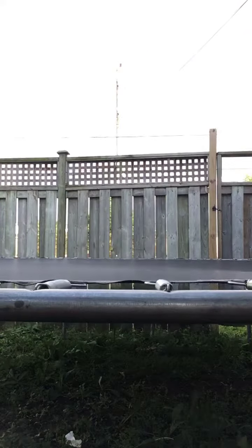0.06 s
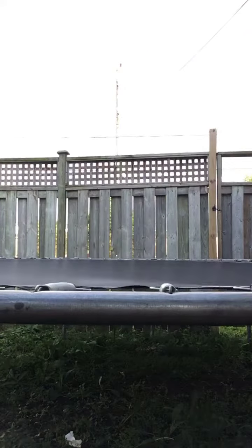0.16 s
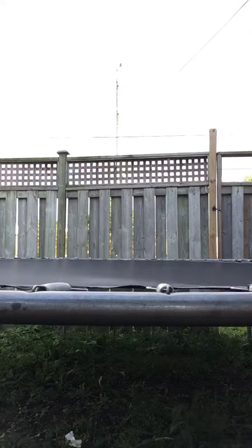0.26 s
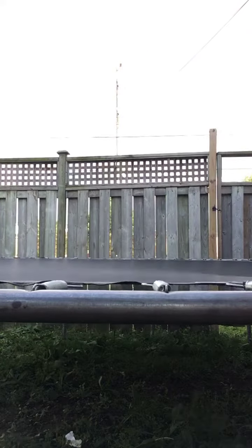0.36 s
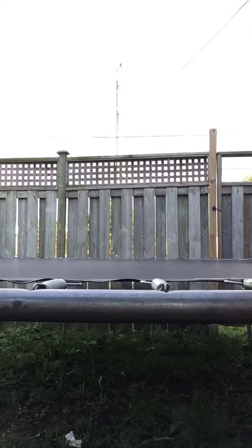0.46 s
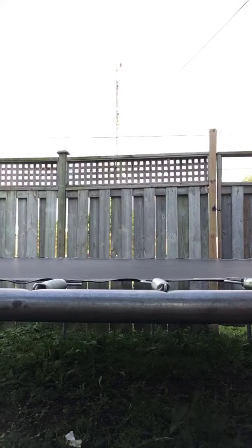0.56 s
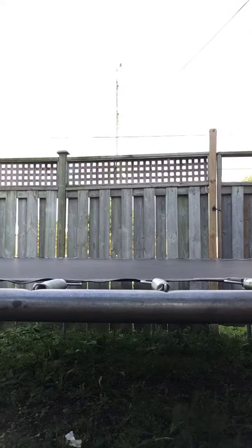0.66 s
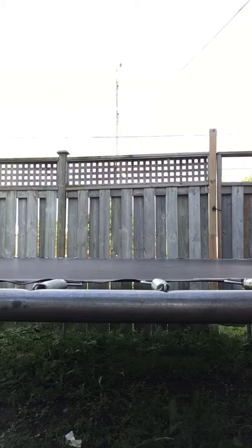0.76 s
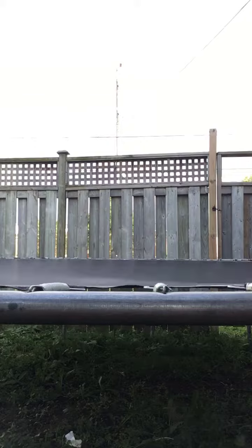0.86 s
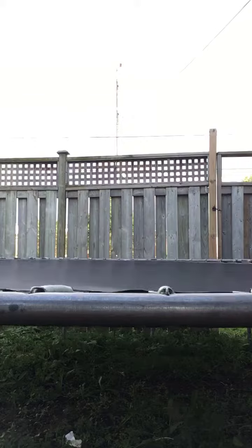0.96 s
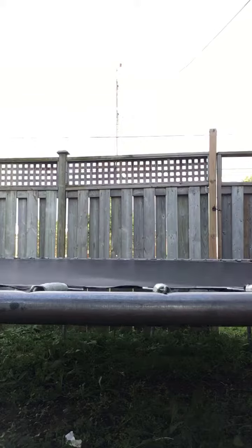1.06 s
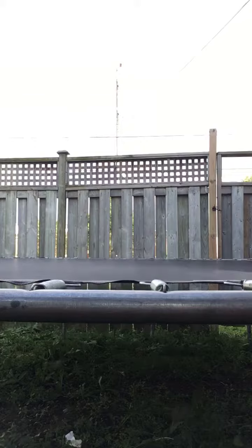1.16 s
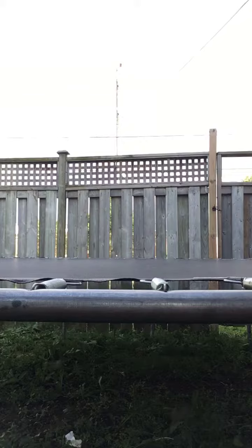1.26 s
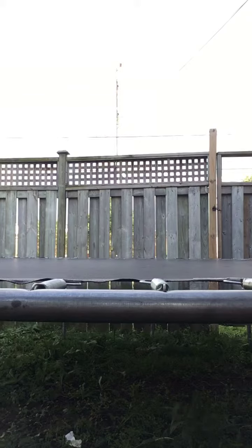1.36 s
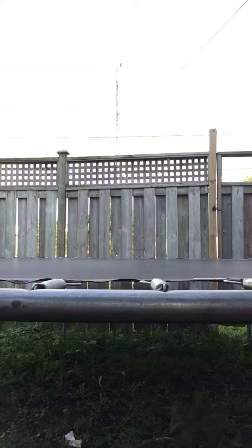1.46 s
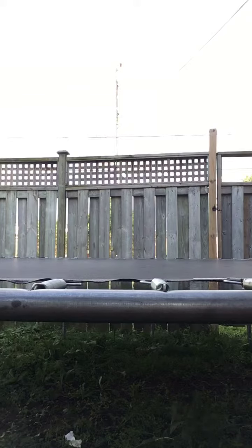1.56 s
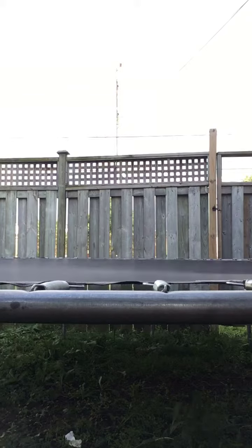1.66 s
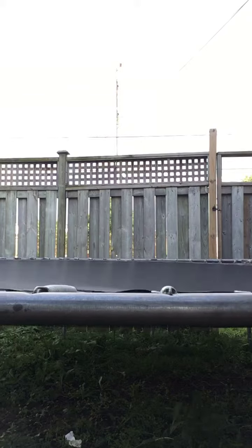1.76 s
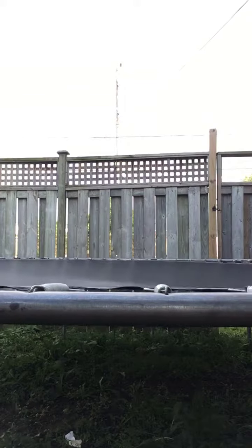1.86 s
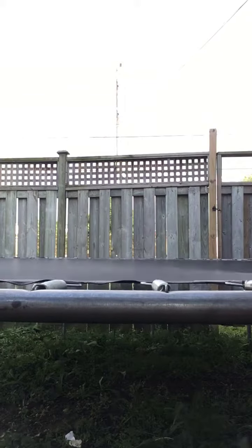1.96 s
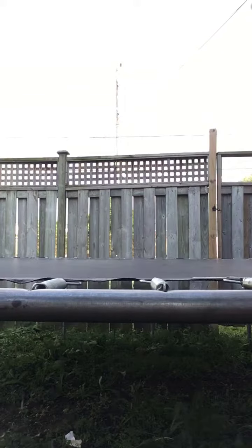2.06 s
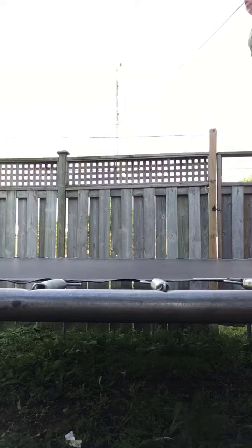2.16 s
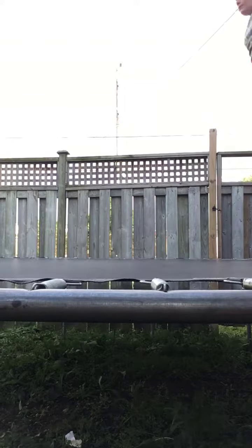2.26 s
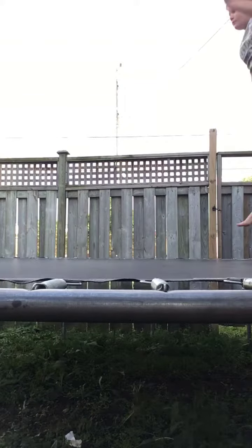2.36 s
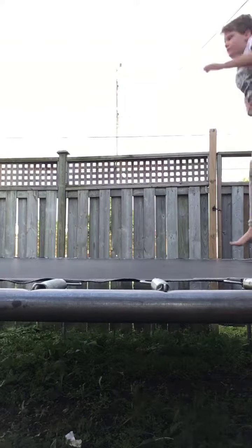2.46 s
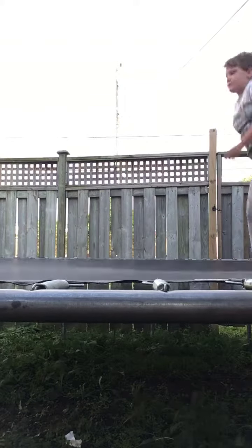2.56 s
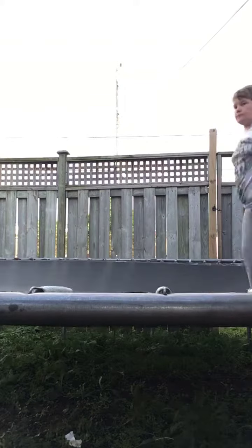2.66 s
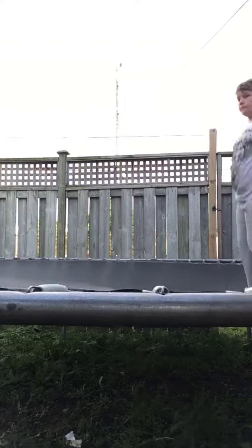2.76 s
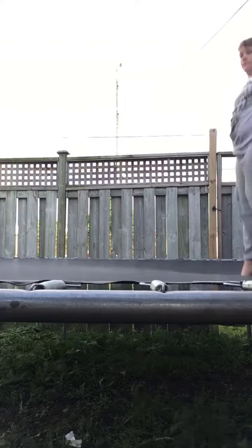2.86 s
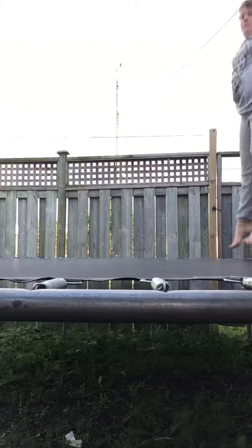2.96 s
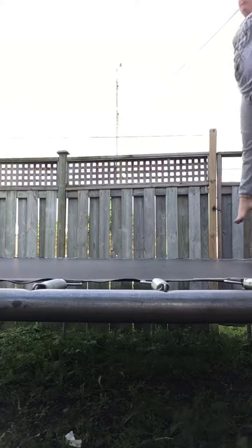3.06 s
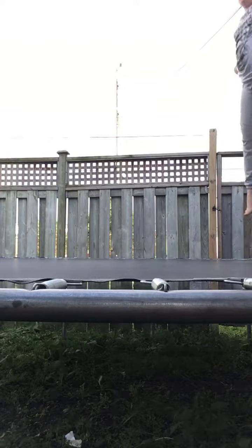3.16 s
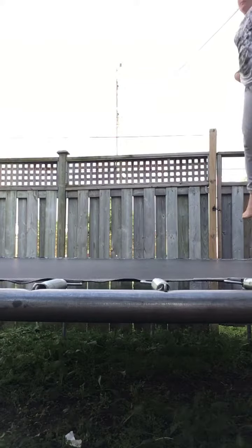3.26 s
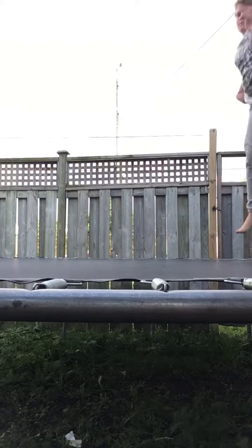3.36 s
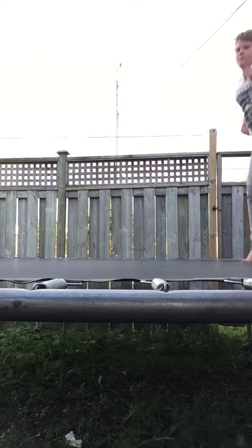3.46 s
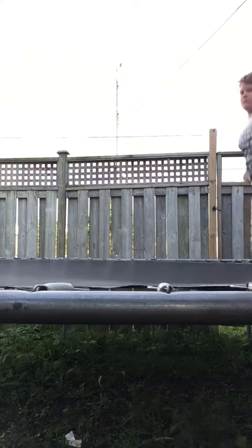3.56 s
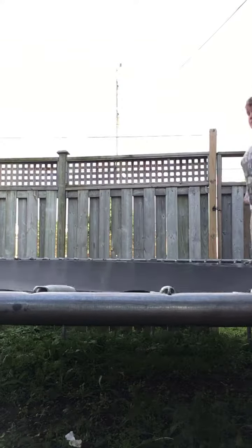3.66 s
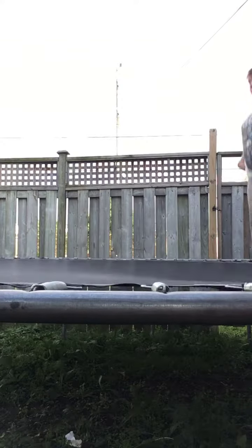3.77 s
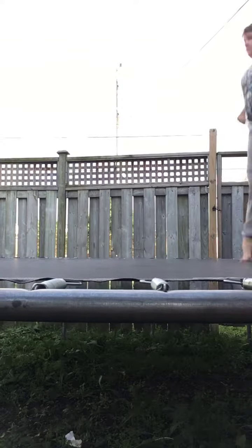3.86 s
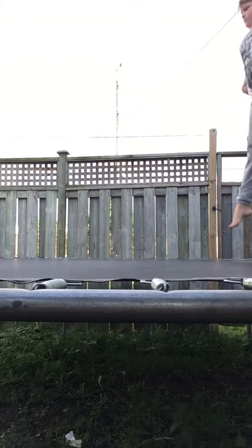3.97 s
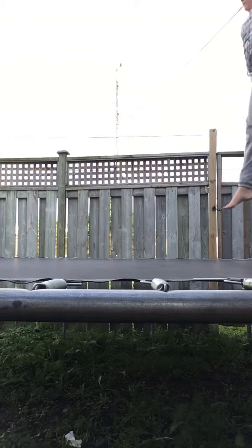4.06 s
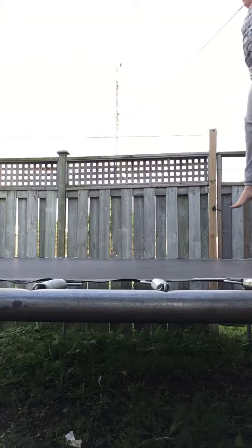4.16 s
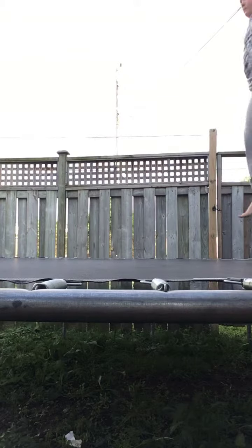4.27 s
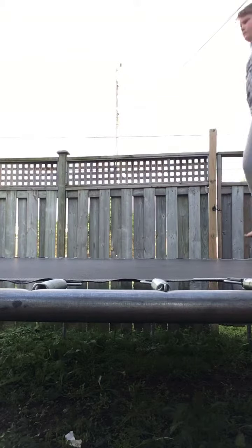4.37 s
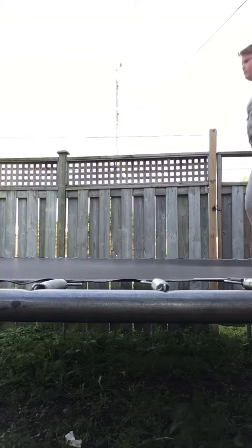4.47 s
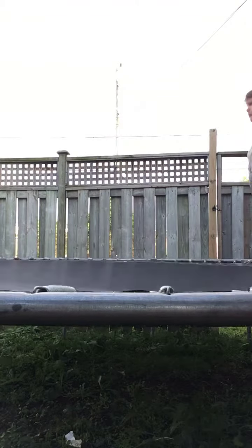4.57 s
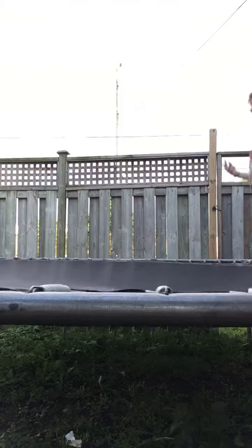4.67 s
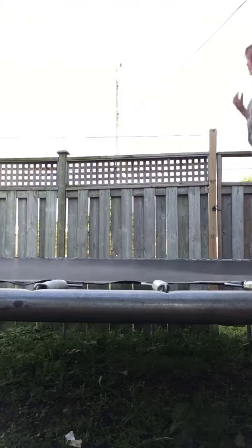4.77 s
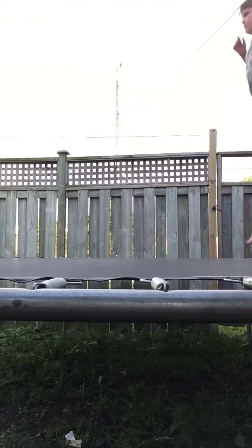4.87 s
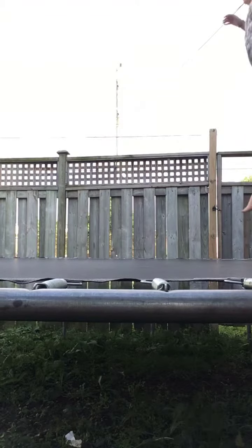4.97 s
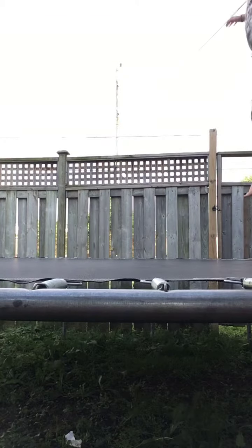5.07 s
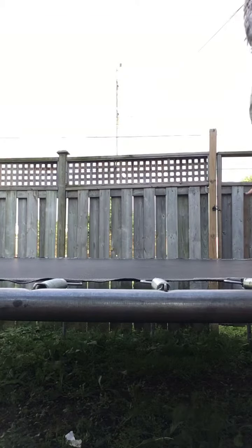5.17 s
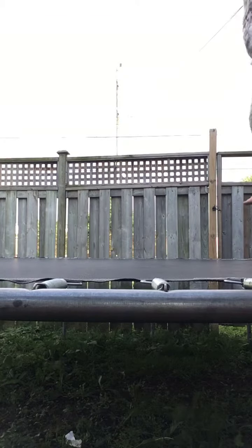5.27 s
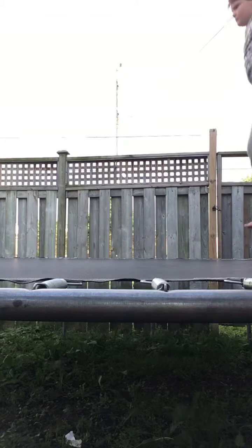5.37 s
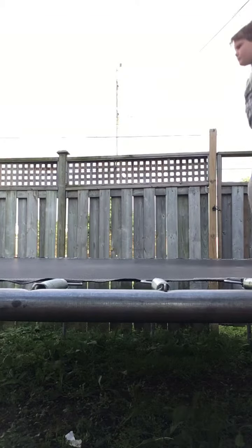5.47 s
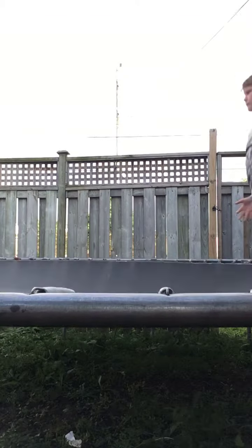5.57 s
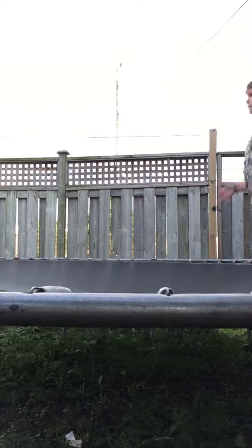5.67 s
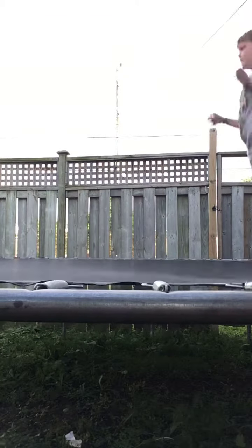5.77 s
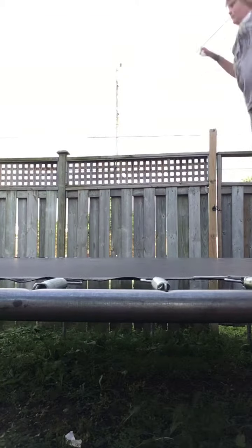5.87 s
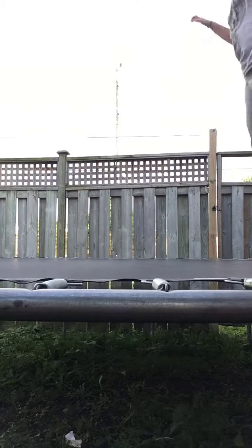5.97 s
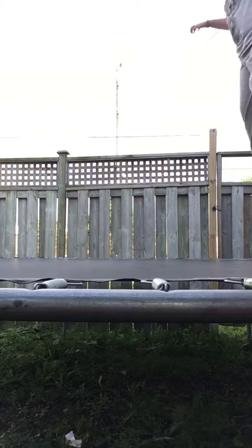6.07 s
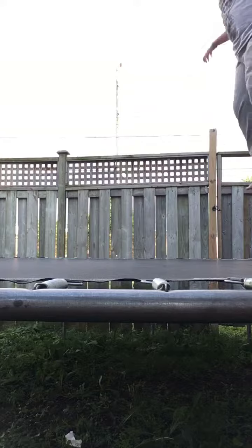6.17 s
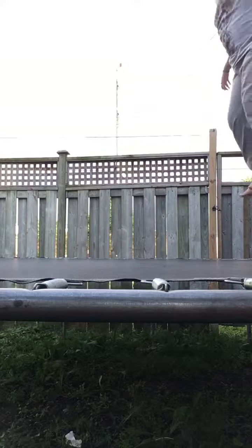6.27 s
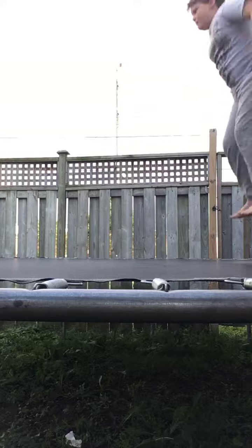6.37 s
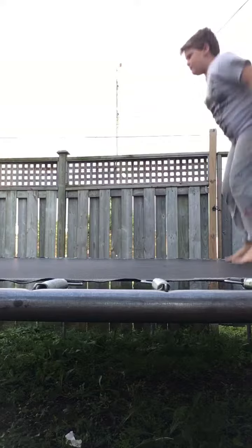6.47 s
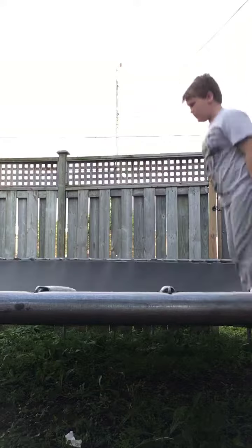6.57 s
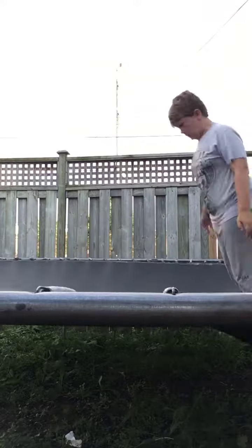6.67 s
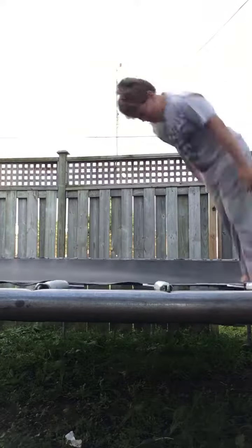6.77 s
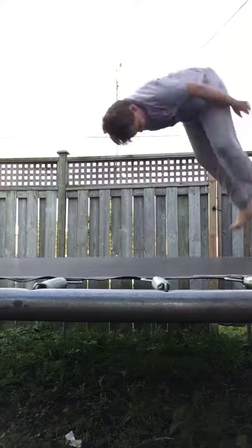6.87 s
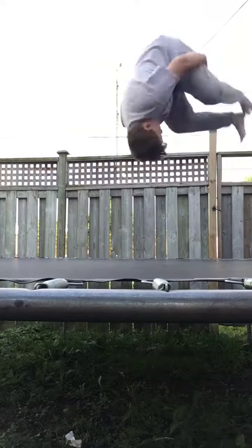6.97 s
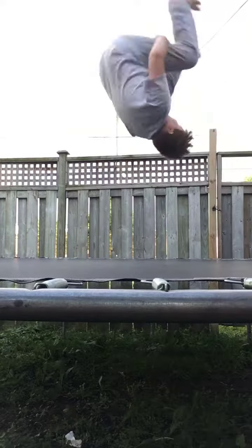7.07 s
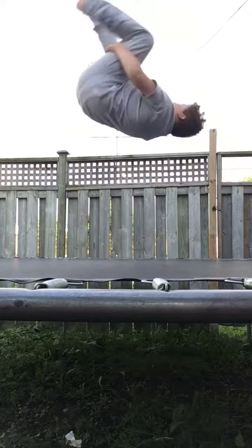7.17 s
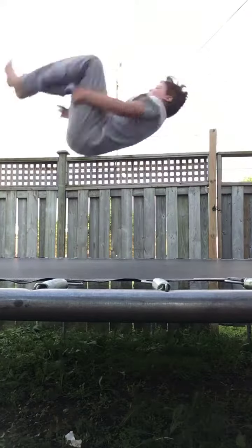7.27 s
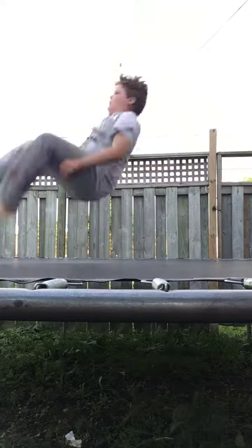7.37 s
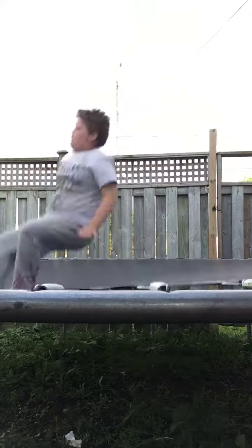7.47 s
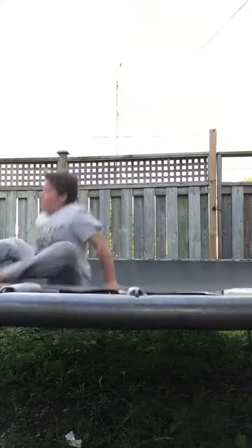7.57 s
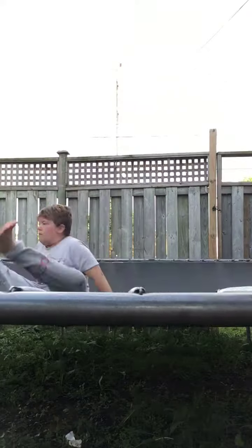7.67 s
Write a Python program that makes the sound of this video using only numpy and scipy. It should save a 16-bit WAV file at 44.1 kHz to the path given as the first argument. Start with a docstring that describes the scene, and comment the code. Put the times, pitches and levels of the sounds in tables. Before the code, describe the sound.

Trampoline springs rasp, clack and squeak with each of nine steady bounces outdoors, ending in a heavier thudding landing.

```python
"""Rasping springs and clacking hooks: someone bounces on a backyard trampoline, heard from beside its
steel frame, and lands heavily at the end. Each landing stretches the mat and springs, which rasp as they
load and again as they let go. Hooks clack and squeak; a spring rings on between bounces. Feet and body
slap the mat in the final landing. The higher jumps thud and fan puffs of air at the microphone, over a
low outdoor rumble."""
import sys
import numpy as np
from scipy import signal
from scipy.fft import rfft, irfft, next_fast_len
from scipy.io import wavfile
from scipy.ndimage import uniform_filter1d, map_coordinates

SR = 44100
rng = np.random.default_rng(int(sys.argv[2]) if len(sys.argv) > 2 else 0)


def generate_wav(sig):
    """Save sig (samples, or channels by samples) to the path in sys.argv[1] as 16-bit PCM at SR."""
    pcm = np.round(np.clip(np.atleast_2d(sig).T, -1, 1) * 32767).astype(np.int16)
    wavfile.write(sys.argv[1], SR, pcm)


N = 340893
T = np.arange(N) / SR
EDGE_HZ = 15850

# landings: (touchdown [s], slap [dB], time to full stretch [s], swell [s per 20 dB], hold [s],
# stretch [dB], time on mat [s], ring [dB], spring left ringing [name])
BOUNCES = [(.2, -42, .06, .075, .056, -34.5, .36, -61, "low"),
           (.943, -43, .075, .125, .01, -35, .39, -70, "low"),
           (1.793, -54, .055, .06, .02, -31, .35, -66, "low"),
           (2.692, -31.5, .065, .13, .06, -35.5, .39, -57, "low"),
           (3.617, -33, .103, .065, .036, -33.5, .38, -59, "low"),
           (4.586, -37, .098, .085, .04, -32.5, .42, -51.5, "high"),
           (5.594, -27.5, .11, .24, .016, -31.5, .43, -51, "high"),
           (6.616, -27, .085, .055, .042, -32, .375, -50, "high"),
           (7.541, -44, .058, .035, .036, -33, .4, -50, "high")]
# spring rasp spectrum: (frequency [Hz], level [dB])
RASP = [(300, -42), (900, -7), (2500, -4), (3800, -4), (4900, -4.5), (6000, -2), (7600, -1), (8800, 2.5),
        (10300, -4), (11200, -4), (13000, -8), (15800, -11.5)]


def amp(db):
    """Decibels to gain."""
    return 10 ** (np.asarray(db) / 20)


def unit(x):
    """Scales to rms 1."""
    return x / np.sqrt(np.mean(x ** 2) + 1e-20)


def add(mix, start_s, sound):
    """Mixes a sound in at start_s."""
    part = mix[max(round(start_s * SR), 0):][:len(sound)]
    part += sound[:len(part)]


def colour(x, points):
    """Filters x by (frequency [Hz], level [dB]) points on a log-frequency axis; rms 1."""
    hz, db = np.transpose(points)
    size = next_fast_len(len(x))
    bins_hz = np.fft.rfftfreq(size, 1 / SR)
    gain = amp(np.interp(np.log(bins_hz + 1), np.log(hz), db))
    return unit(irfft(rfft(x, size) * gain, size)[:len(x)])


def drift(rate_hz):
    """Smooth random wander; rms 1."""
    knots, t = rng.standard_normal(N // 50), T[::20]
    return unit(np.interp(T, t, map_coordinates(knots, [t * rate_hz], order=2, mode="wrap")))


def strike(t, rise_s, t60_s):
    """Impact envelope: quick rise, exponential decay."""
    return (1 - np.exp(-t / rise_s)) * amp(-60 * t / t60_s)


def swell(peak_s, hold_s, db, rise_db_per_s, fall_db_per_s):
    """Gain that climbs to db at peak_s, holds, and falls away."""
    before_db = rise_db_per_s * np.maximum(peak_s - T, 0)
    after_db = fall_db_per_s * np.maximum(T - peak_s - hold_s, 0)
    return amp(np.maximum(db - before_db - after_db, -150))


def slips(per_s, spread_db):
    """Tiny friction slips: random clicks, a few of them large; rms 1."""
    size = amp(spread_db * np.minimum(rng.exponential(1, N), 3))
    return unit(rng.choice([-1., 1.], N) * size * (rng.random(N) < per_s / SR))


def yard():
    """Distant outdoor rumble and a faint wavering hum."""
    # outdoor air: (frequency [Hz], level [dB])
    spectrum = [(25, -32), (40, -17), (62, -2.5), (90, -7.5), (125, -24), (150, -18), (210, -16.5),
                (320, -23), (470, -25.5), (620, -25), (1340, -27), (2000, -37.5), (2450, -35), (3300, -44),
                (5000, -49.5), (15500, -54.5)]
    air = amp(-51) * colour(rng.standard_normal(N), spectrum) * amp(.5 * drift(7.5))
    air = signal.sosfilt(signal.butter(4, 34, "high", fs=SR, output="sos"), air)
    hum = amp(-57.5) * np.sin(2 * np.pi * 120 * T + 0.85 * drift(5.8))
    return air + hum * (1 + .5 * np.tanh(drift(5)))


def sliding():
    """How hard the springs slide: a surge as the mat sinks, light slipping under load, fits as it rises."""
    # springs sliding back: (time [s], hold [s], level [dB])
    recoils = [(.01, 0.0091, -42.5), (0.46, .035, -52.5), (0.522, 0.027, -44.5), (1.19, 0.036, -48.5),
               (1.262, .05, -42), (2.063, 0.05, -42.5), (2.903, 0.094, -41.5), (3.046, 0.061, -49),
               (3.175, 0.0066, -58), (3.866, 0.016, -38.5), (3.93, 0.013, -41), (4.057, 0.012, -54),
               (4.801, .02, -37), (4.993, 0.011, -42.5), (5.09, 0.0088, -55), (5.83, .01, -43.5),
               (5.887, 0.026, -40), (5.991, 0.02, -43), (6.83, 0.014, -40), (6.903, .025, -40),
               (6.96, 0.027, -42.5), (7.08, 0.015, -53.5)]
    grip_s, take_up_s, settle_s = 0.026, 0.049, 0.015  # settle: the mat quivers after the feet leave
    power = np.zeros(N)
    for s, _, delay_s, swell_s, hold_s, db, stay_s, _, _ in BOUNCES:
        grip = np.clip((T - s) / grip_s, 0, 1)
        surge = grip * swell(s + delay_s, hold_s, db, rise_db_per_s=20 / swell_s, fall_db_per_s=297)
        loaded_s = stay_s + settle_s - take_up_s
        contact = swell(s + take_up_s, loaded_s, db=-51.5, rise_db_per_s=317, fall_db_per_s=206)
        power += surge ** 2 + contact ** 2
    for s, hold_s, db in recoils:
        power += swell(s, hold_s, db, rise_db_per_s=560, fall_db_per_s=272) ** 2
    return np.sqrt(power)


def jangle(x, t60_s, ring_db, count=4):
    """Adds dense ringing to x: decaying noise tails, with the drive wandering among them."""
    t = T[:SR // 3]
    shares = np.array([drift(22) for _ in range(count)])
    shares /= np.linalg.norm(shares, axis=0)
    tails = rng.standard_normal((count, len(t))) * amp(-60 * t / t60_s)
    tails /= np.linalg.norm(tails, axis=1, keepdims=True)
    return x + amp(ring_db) * signal.oaconvolve(x * shares, tails, axes=1).sum(0)[:N]


def clinks(per_s, t60_s, count=28):
    """Coils touch one another: brief pings, each spring at its own pitch."""
    out, t = np.zeros(N), T[:SR // 12]
    pitches_hz = rng.uniform(3000, 12500, count)
    for when, which, size, life in rng.random((int(per_s * N / SR), 4)):
        shape = strike(t, rise_s=0.0028, t60_s=t60_s * (.5 + life))
        tone = np.sin(2 * np.pi * pitches_hz[int(which * count)] * t)
        add(out, when * N / SR, amp(28 * size ** 2) * shape * tone)
    return colour(out, RASP)


def groan():
    """The frame tubes creak with a low, hollow voice."""
    # tube resonances: (frequency [Hz], level [dB])
    spectrum = [(440, -50), (540, -11.5), (605, 6), (680, -21.5), (790, -2.5), (900, -12), (1300, -43)]
    return colour(slips(per_s=900, spread_db=0.87), spectrum)


def stretching():
    """Slips in the hooks and mat edge follow the load of each bounce; returns (springs, frame)."""
    # frame scrape: (frequency [Hz], level [dB])
    spectrum = [(100, -18), (300, -15.5), (480, -9.5), (600, -4), (850, -3.5), (1100, 1.5), (1500, -2),
                (1900, 0.5), (2300, -2.5), (2800, 1.5), (3400, -5), (5000, -13), (9000, -24)]
    load = sliding()
    judder_db = drift(130)  # hooks move in fits
    rasp = colour(jangle(slips(per_s=5000, spread_db=2.6), t60_s=0.11, ring_db=-1), RASP)
    rasp += amp(-14) * clinks(per_s=380, t60_s=0.05)
    scrape = colour(jangle(slips(per_s=1500, spread_db=3.6), t60_s=0.089, ring_db=3), spectrum)
    scrape_db = -22.96 + 0.5745 * T + 0.16 * judder_db  # hardens as the jumps get higher
    springs = rasp * load * amp(judder_db)
    frame = scrape * load ** 0.56 * amp(scrape_db) + amp(-20) * load * groan()
    return springs, frame


def coils(x, t60_s):
    """The strongest resonances of the coil springs, struck by x."""
    # coil modes: (frequency [Hz], level [dB])
    modes = [(610, -2), (790, -20), (1080, -12), (1230, 3), (1392, 14), (1680, 14), (2606, 12), (2828, 13),
             (3047, 7), (5830, -30), (7005, 16.5), (8010, 9), (8149, 11), (8393, -25), (8824, -19),
             (9170, -10)]
    t = T[:SR // 2]
    ring = sum(amp(db) * np.sin(2 * np.pi * (hz * t + rng.random())) for hz, db in modes)
    ring *= amp(-60 * t / t60_s)
    return signal.oaconvolve(x, ring / np.linalg.norm(ring))[:N]


def clacks():
    """Slaps on the mat and snapping hooks set the steel chattering; returns (springs, frame)."""
    # hooks snapping, and feet and body slapping the mat in the final landing:
    # (time [s], frame knock [dB], spring chink [dB])
    jolts = [(0.166, -53, -53), (0.199, -49, -46), (.229, -39, -51), (.252, -40, -34), (.312, -40, -48),
             (.624, -53, -49.5), (.857, -63, -58), (.923, -51, -74), (1.116, -40.5, -59),
             (1.733, -59, -55.5), (1.768, -48, -77), (1.794, -64, -44), (1.83, -42, -39), (2.282, -68, -60),
             (2.457, -54.5, -60.5), (2.67, -44, -41.5), (2.733, -35, -44), (2.868, -39.5, -32.5),
             (2.908, -43, -33.5), (3.382, -68, -60), (3.605, -37, -38), (4.558, -49, -55),
             (4.586, -46, -36.5), (4.789, -34.5, -34), (4.982, -34.5, -34), (5.217, -49.5, -66),
             (5.605, -22.5, -26), (5.823, -46, -33), (6.069, -45, -45), (6.207, -52, -59.5),
             (6.819, -39.5, -34.5), (6.987, -32, -36.5), (7.519, -58, -66), (7.539, -46.5, -42.5),
             (7.618, -24.5, -45), (7.719, -27, -30.5)]
    # frame knock: (frequency [Hz], level [dB])
    spectrum = [(100, -12), (450, -8.5), (640, -4.5), (1150, 6), (1500, 1), (1900, 2.5), (2500, -2.5),
                (3400, -11.5), (5000, -12), (9000, -21)]
    chink, knock, t = np.zeros(N), np.zeros(N), T[:SR // 2]
    slap = strike(t, rise_s=0.002, t60_s=0.14)
    for s, slap_db, *_ in BOUNCES:
        add(chink, s, amp(slap_db - 13) * slap)
        add(knock, s, amp(slap_db) * slap)
    for s, knock_db, chink_db in jolts:
        halvings = (max(knock_db, chink_db) + 38.5) / 19.5  # a harder jolt settles sooner
        jolt = strike(t, rise_s=0.0016, t60_s=.11 * .5 ** halvings)
        add(chink, s, amp(chink_db) * jolt)
        add(knock, s, amp(knock_db) * jolt)
    chink *= colour(slips(per_s=9000, spread_db=1.1), RASP)
    chink += amp(-11) * np.diff(chink, prepend=0)  # jolts are brighter than the steady rasp
    knock *= colour(slips(per_s=4000, spread_db=3.6), spectrum)
    return chink, knock


def rings(rise_s, t60_s):
    """A slack spring sings on as the feet leave; near pitches beat against each other."""
    # modes of two springs, by name: (frequency [Hz], level [dB])
    modes = {"low": [(2386, 0), (2396, -6), (2417, -9), (2251, -12)], "high": [(2454, 0), (2482, -1.5),
             (2523, -6.5)]}
    out, t = np.zeros(N), T[:2 * SR]
    shape = strike(t, rise_s, t60_s)
    for s, *_, stay_s, ring_db, spring in BOUNCES:
        for hz, db in modes[spring]:
            tone = np.sin(2 * np.pi * (hz * t + rng.random()))
            add(out, s + stay_s, amp(ring_db + db) * shape * tone)
    return out


def squeaks(waver, overtone_db, fall_db_per_s):
    """Hooks stick and slip: brief tones of unsteady pitch, dying away in the spring."""
    # hook squeaks: (time [s], length [s], pitch [Hz], level [dB])
    events = [(.944, 0.033, 1271, -45), (1.726, 0.054, 7100, -64), (2.168, .08, 2520, -54),
              (2.9, .03, 5870, -48), (3.62, 0.028, 2510, -42), (4.579, 0.04, 6920, -49),
              (4.786, 0.025, 5810, -40), (4.803, .03, 1890, -46.5), (4.977, .03, 6450, -43),
              (4.999, 0.044, 2604, -44), (5.0, 0.051, 4060, -53), (5.808, .025, 3510, -47),
              (6.003, 0.032, 1433, -38), (6.012, .043, 4080, -45.5), (6.014, .044, 5375, -51),
              (6.99, .12, 2500, -47), (7.587, .04, 764, -42.5), (7.595, 0.054, 2390, -40.5)]
    out, t, wander = np.zeros(N), T[:SR // 3], drift(220)
    for s, length_s, hz, db in events:
        pitch_hz = hz * (1 + waver * np.roll(wander, -round(s * SR))[:len(t)])
        phase = 2 * np.pi * np.cumsum(pitch_hz) / SR
        attack = np.minimum(t / (0.13 * length_s), 1)
        release = amp(-fall_db_per_s * np.maximum(t - 0.69 * length_s, 0))
        overtones = sum(np.sin(k * phase) for k in (2, 3) if k * hz < EDGE_HZ)
        tone = np.sin(phase) + amp(overtone_db) * overtones
        add(out, s, np.sqrt(2) * amp(db) * attack * release * tone)
    return out


def draught(from_s, lag_s, width_s):
    """Each high jump pushes air out from under the mat; the air stays stirred in between."""
    # turbulence at the microphone: (frequency [Hz], level [dB])
    spectrum = [(25, -10.5), (45, -3.5), (65, 2.5), (100, -7), (160, -17), (300, -28), (700, -48),
                (3000, -84)]
    pushes = sum(np.exp(-.5 * ((T - s - lag_s) / width_s) ** 2) for s, *_ in BOUNCES if s > from_s)
    since_s = T - from_s
    breeze = np.clip(since_s, 0, 1) * amp(-59.5 + 2 * since_s + 5.5 * drift(7.8))
    swirl = colour(rng.standard_normal(N), spectrum)
    swirl /= np.sqrt(uniform_filter1d(abs(signal.hilbert(swirl)) ** 2 / 2, size=500))  # even strength
    return swirl * np.hypot(amp(-41.5) * pushes, breeze)


def puffs(min_hz, cycles_per_half):
    """Eddies strike the microphone port: a few uneven pressure swings each, faster in brief puffs."""
    # strongest eddies: (centre [s], half length [s], level [dB])
    eddies = [(4.412, 0.021, -43.5), (4.638, 0.013, -33), (4.71, 0.0081, -32.5), (4.711, 0.023, -24.5),
              (5.077, .034, -41.5), (5.567, 0.015, -37.5), (5.652, .05, -36.5), (5.878, .035, -39.5),
              (6.358, .025, -36.5), (6.457, 0.018, -40.5), (6.763, 0.00724, -28), (6.786, 0.022, -35),
              (7.099, .03, -39), (7.176, 0.0166, -31.5), (7.242, .016, -38.5), (7.374, 0.011, -30.5),
              (7.412, .014, -37), (7.538, 0.0098, -32), (7.668, 0.0053, -35.5), (7.704, .035, -35.5)]
    out = np.zeros(N)
    wander = 2 ** (0.452 * drift(110))
    for s, half_s, db in eddies:
        near = abs(T - s) < 5 * half_s
        centre_hz = max(min_hz, cycles_per_half / half_s)
        turns = np.cumsum(centre_hz * wander[near]) / SR + rng.random()
        swing = np.sin(2 * np.pi * turns) + amp(-15.5) * np.sin(2 * np.pi * (2 * turns + rng.random()))
        shape = np.exp(-.5 * ((T[near] - s) / half_s) ** 2)
        out[near] += np.sqrt(2) * amp(db) * shape * swing
    return out


def thuds():
    """Feet and body meet the mat; the taut fabric gives a short, dull flap."""
    # blows on the mat: (time [s], level [dB], t60 [s])
    blows = [(4.54, -46.5, 0.15), (5.548, -37, 0.27), (5.597, -47, 0.14), (6.571, -40.5, 0.33),
             (7.521, -26, 0.069), (7.559, -35.5, 0.26), (7.62, -38.5, 0.1), (7.666, -27, 0.19)]
    # fabric flap: (frequency [Hz], level [dB])
    spectrum = [(50, -12), (130, 7), (320, -10.5), (520, -16), (1200, -18), (4000, -50)]
    envelope, t = np.zeros(N), T[:SR // 2]
    for s, db, t60_s in blows:
        add(envelope, s, amp(db) * strike(t, rise_s=0.00056, t60_s=t60_s))
    return envelope * colour(slips(per_s=3000, spread_db=1.6), spectrum)


def scene():
    """The trampoline, the air it moves and the yard; mono."""
    rasp, scrape = stretching()
    chink, knock = clacks()
    springs, frame = rasp + chink, scrape + knock
    ringing = coils(springs, t60_s=.17) + coils(frame, t60_s=.17)
    steel = springs + frame + amp(-15.5) * ringing
    trampoline = steel + squeaks(waver=0.0096, overtone_db=-19, fall_db_per_s=380) + thuds()
    trampoline = jangle(trampoline, t60_s=0.44, ring_db=-15.5)  # weak scatter from fence and yard
    trampoline += rings(rise_s=0.0019, t60_s=2.03)
    air = puffs(min_hz=60.45, cycles_per_half=1.25) + draught(from_s=4.3, lag_s=0.067, width_s=0.092)
    return (trampoline + air + yard())[None]


def record(dry):
    """The microphone sheds the deepest bass; then the band limit."""
    heard = signal.sosfilt(signal.butter(3, 30, "high", fs=SR, output="sos"), dry)
    lowpass = signal.firwin(511, EDGE_HZ, window=("kaiser", 9), fs=SR)
    return signal.oaconvolve(heard, lowpass[None], "same")


dry = scene()
out = record(dry)
generate_wav(out)
```